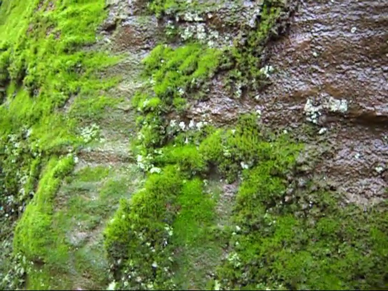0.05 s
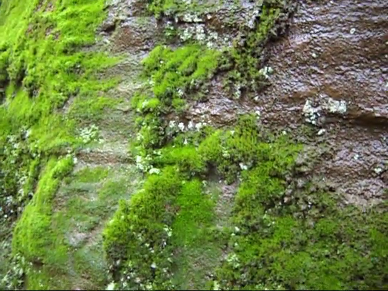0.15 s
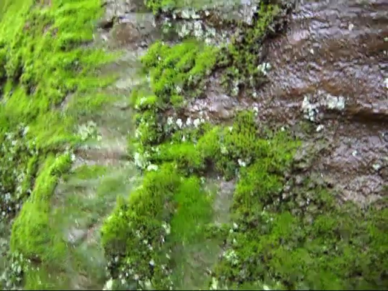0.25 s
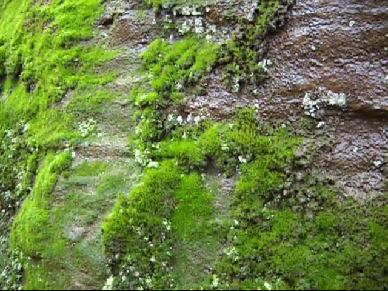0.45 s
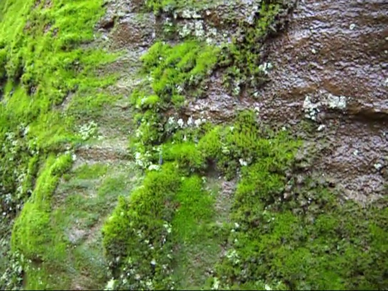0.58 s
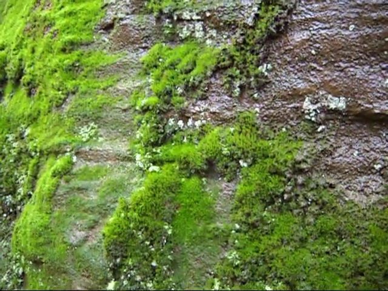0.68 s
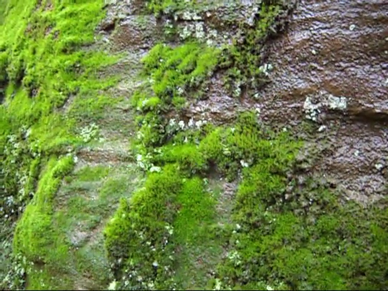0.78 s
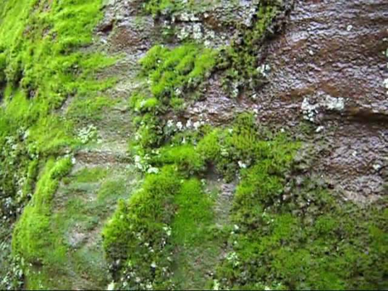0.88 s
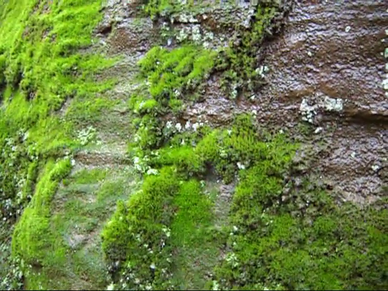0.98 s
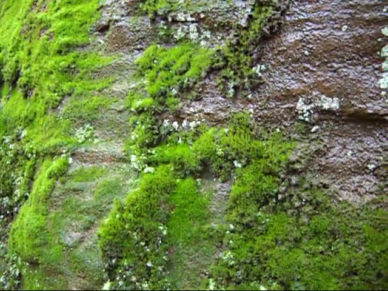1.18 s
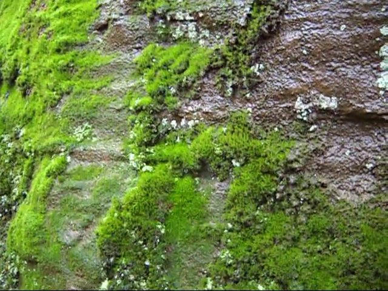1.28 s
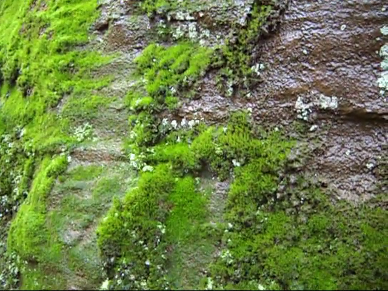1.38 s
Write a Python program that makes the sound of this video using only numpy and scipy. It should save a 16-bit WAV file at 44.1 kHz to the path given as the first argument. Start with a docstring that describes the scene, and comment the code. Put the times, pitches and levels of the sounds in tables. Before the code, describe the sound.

A quick cluster of water drops hits wet rock close by, over faint airy hiss.

```python
"""Water drops tick on wet rock close to the microphone, outdoors, in a faint hiss of air over a low rumble.
Each drop is a click with two short pitched plips and a splash of noise; the rock rings briefly as fading
sine waves, and its face scatters the sound as fading noise.
Later comes a soft low bump, probably a hand on the recorder: a few low fading sine waves and a noisy rub."""
import sys
import numpy as np
from scipy import signal
from scipy.fft import rfft, irfft
from scipy.io import wavfile

SR = 44100
rng = np.random.default_rng(int(sys.argv[2]) if len(sys.argv) > 2 else 0)


def generate_wav(sig):
    """Save sig (samples, or channels by samples) to the path in sys.argv[1] as 16-bit PCM at SR."""
    pcm = np.round(np.clip(np.atleast_2d(sig).T, -1, 1) * 32767).astype(np.int16)
    wavfile.write(sys.argv[1], SR, pcm)


N = 63945  # length in samples
T = np.arange(N) / SR  # time in seconds


def undb(db):
    """Turn decibels into a plain factor."""
    return 10 ** (np.asarray(db) / 20)


def level(x, db):
    """Scale a sound so that its average (rms) level is db."""
    return x * undb(db) / np.sqrt(np.mean(x ** 2))


def fade(t60):
    """Exponential decay that drops by 60 dB in t60 seconds."""
    return np.exp(-np.log(1000) * T / t60)


def delay(x, s):
    """Start a sound s seconds later."""
    silence = np.zeros(max(int(s * SR), 0))
    return np.concatenate([silence, x])[:N]


def convolve(x, h):
    """Pass a sound through a filter given by its impulse response."""
    return signal.fftconvolve(x, h)[:N]


def colour(x, points):
    """Filter through (f/Hz, level/dB) points; it reacts only after its input, as real objects do."""
    size = 16384
    hz, db = np.array(points).T
    f = np.maximum(np.arange(size // 2 + 1) * SR / size, 1)
    gain = undb(np.interp(np.log(f), np.log(hz), db))
    # Folding the cepstrum (the transform of the log gain) forward in time gives minimum phase.
    cepstrum = irfft(np.log(gain))
    cepstrum[1:size // 2] *= 2
    cepstrum[size // 2 + 1:] = 0
    response = irfft(np.exp(rfft(cepstrum)))[:size // 2]
    return convolve(x, response)


def treble(x, db):
    """Raise or lower the top octaves by db, with a slope from 2800 to 5000 Hz."""
    return colour(x, [(2800, 0), (5000, db)])


def burst(t60, db):
    """Fading noise with a set total energy."""
    x = rng.standard_normal(N) * fade(t60)
    return x * undb(db) / np.sqrt(np.sum(x ** 2))


def mode(hz, db, t60):
    """One damped vibration: a sine wave that fades."""
    return undb(db) * np.sin(2 * np.pi * hz * T) * fade(t60)


def drops():
    """Every drop excites the same rock: tick and plips, then the ring and the scattered sound."""
    # drops: t/s, level/dB, first plip f/Hz, its level/dB, second plip f/Hz, its level/dB,
    # treble of the tick/dB, scattered sound/dB (all levels relative)
    drop_rows = [(.2160, -16, 873, 14, 1735, 2.5, 4, 6), (0.2363, 0, 1444, 1.5, 2270, -0.5, 1.5, 0),
                 (.2617, -22, 840, 3, 2220, -3, 3.5, -5), (0.2744, -23, 836, 6, 2200, -11, 1.5, -6),
                 (0.397, -14, 806, 6, 2310, -2, -0.5, -2), (0.4556, -25, 1427, 12.5, 705, -2, 5.5, 2)]
    all_drops_db = 1.5
    plip_lead_s = 0.0008  # the water starts to vibrate just before the click
    ring = rock_ring()
    out = np.zeros(N)
    for s, db, hz1, db1, hz2, db2, treble_db, scatter_db in drop_rows:
        struck = tick(treble_db) + ring + undb(scatter_db) * rock_scatter()
        plips = plip(hz1, db1) + plip(hz2, db2)
        drop = delay(struck, s) + delay(plips, s - plip_lead_s)
        out += undb(all_drops_db + db) * drop
    return out


def tick(treble_db):
    """The impact: a one-sample click plus a short splash of noise, both coloured alike."""
    # colour of a tick: f/Hz, level/dB
    tick_points = [(150, -27.5), (400, -34), (520, -3.5), (900, 3.5), (1100, -8), (1450, 4), (1950, -5),
                   (2200, 2), (2600, -8), (3000, -33), (4100, -32.5), (4900, -25.5), (5750, -7.5),
                   (7100, -10.5), (8000, -55), (8800, -18), (10200, -9), (11000, -28)]
    click = T == 0
    splash = burst(t60=0.016, db=-0.5)
    return treble(colour(click + splash, tick_points), treble_db)


def plip(hz, db):
    """A few cycles of vibrating water that swell and die at once."""
    base_db, t60_s, rise_s = -20.5, 0.014, 0.0013
    swell = 1 - np.exp(-(T / rise_s) ** 2)
    return mode(hz, base_db + db, t60_s) * swell


def rock_ring():
    """What rings after a drop: damped vibrations that build up in about a millisecond."""
    # vibrations: f/Hz, level/dB, 60 dB decay time/s
    ring_modes = [(110.56, -48, 0.58), (538, -38, 0.11), (758, -50, 0.21), (834, -49, 0.083),
                  (918, -47, 0.12), (1126, -61, 0.6), (1634, -60.5, .12), (2315, -84, 0.082)]
    rise_s = 0.0012
    return sum(mode(*row) for row in ring_modes) * (1 - np.exp(-T / rise_s))


def rock_scatter():
    """The rock face scatters the sound as noise that fades quickly at first, then in a faint tail."""
    # colour of the scattered sound: f/Hz, level/dB
    scatter_points = [(200, -12), (420, -7), (560, -5), (880, -1), (1400, -1), (1950, -3.5), (2400, -3),
                      (3100, -23), (4100, -30.5), (5700, -13.5), (7000, -15), (8000, -26.5), (9200, -16.5),
                      (10300, -18.5), (11000, -28.5)]
    near = burst(t60=0.14, db=-6)
    far = burst(t60=1, db=-11.5)
    return delay(colour(near + far, scatter_points), 0.003)


def bump():
    """A soft push and a weaker rebound swell a few low damped vibrations, with a brief rub."""
    # vibrations, deepest first: f/Hz, level/dB, 60 dB decay time/s, rise time/s
    bump_modes = [(57, -28.5, 0.16, 0.013), (161.8, -20, 0.061, 0.021), (335, -34.5, 0.069, .022),
                  (586, -57, 0.053, 0.0071), (695, -52, 0.043, 0.0052)]
    # push and rebound: t/s, level/dB, level of all but the deepest vibration/dB
    bump_rows = [(1.130, -3.5, 2.5), (1.164, -8, -12.5)]
    deep, *upper = [mode(hz, db, t60) * (1 - np.exp(-(T / rise) ** 2))
                    for hz, db, t60, rise in bump_modes]
    body = np.zeros(N)
    for s, db, upper_db in bump_rows:
        push = deep + undb(upper_db) * sum(upper)
        body += delay(undb(db) * push, s)
    return rub() - body  # the push first moves the wave downwards


def rub():
    """Friction as coloured noise that swells and sinks in a short bell shape."""
    # colour of the rub: f/Hz, level/dB
    rub_points = [(300, 3.5), (1200, -3.5), (1700, -11), (2300, 0), (3200, -14.5), (4200, -22),
                  (5800, -5.5), (8000, -18), (10200, -8), (11000, -21)]
    peak_s, width_s = 1.142, 0.01
    noise = level(colour(rng.standard_normal(N), rub_points), -61.5)
    return noise * np.exp(-.5 * ((T - peak_s) / width_s) ** 2)


def air_hiss():
    """Faint even hiss of the air: steady coloured noise."""
    # colour of the hiss: f/Hz, relative level per Hz/dB
    air_points = [(88, -30), (150, -0.5), (325, -1), (425, -6.5), (474, -4), (547, -8), (784, -7),
                  (1010, -10), (1370, -7), (2110, -13), (2390, -12), (2760, -15), (3950, -20.5),
                  (5660, -16.5), (7960, -24), (10200, -17), (11000, -27), (14300, -59.5), (22000, -120)]
    return level(colour(rng.standard_normal(N), air_points), -67.5)


def low_rumble():
    """Low noise that swells and sinks slowly."""
    # colour of the rumble: f/Hz, relative level per Hz/dB
    rumble_points = [(15, -6.5), (35, -7), (58, 0), (85, -11.5), (130, -18.5), (200, -31)]
    # swell of the rumble: t/s, level change/dB
    swell_points = [(0, -3.5), (.2, 2.5), (.58, -1.5), (.85, 0.5), (1.0, -4.5), (1.3, 0), (1.45, -9.5)]
    low_pass = signal.butter(4, 250, fs=SR, output="sos")
    low = signal.sosfilt(low_pass, colour(rng.standard_normal(N), rumble_points))
    swell_db = np.interp(T, *np.array(swell_points).T)
    return level(low, -59.5) * undb(swell_db)


def scene():
    """Add the drops, the bump and the background in one channel."""
    return (drops() + bump() + air_hiss() + low_rumble())[None]


def record(dry):
    """The recorder cuts the top: a steep filter lets through what lies below top_hz."""
    top_hz = 11100
    # order 10, 0.2 dB ripple below the edge, 70 dB cut above
    top_cut = signal.ellip(10, .2, 70, top_hz, fs=SR, output="sos")
    return signal.sosfilt(top_cut, dry)


dry = scene()
out = record(dry)
generate_wav(out)
```